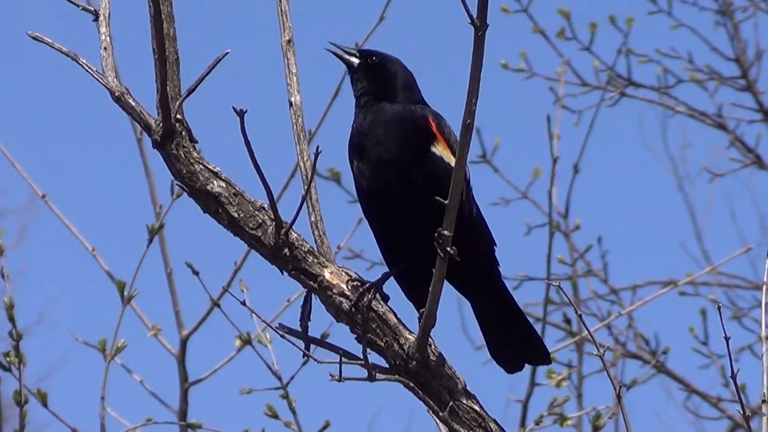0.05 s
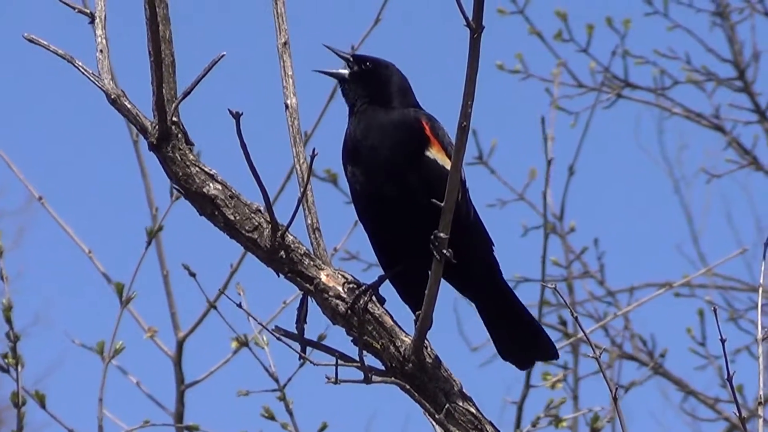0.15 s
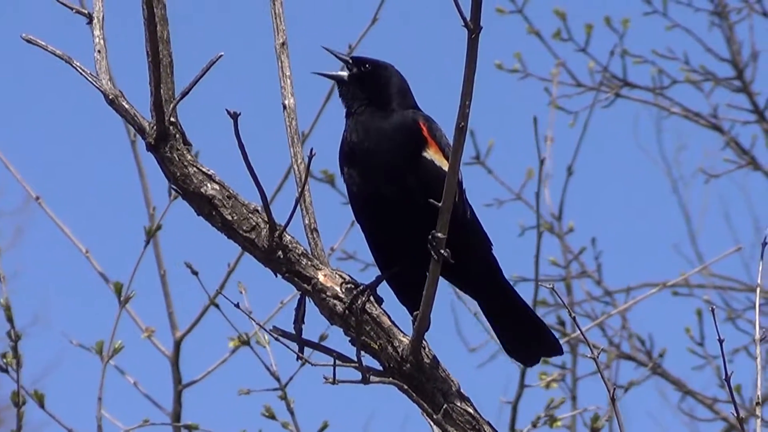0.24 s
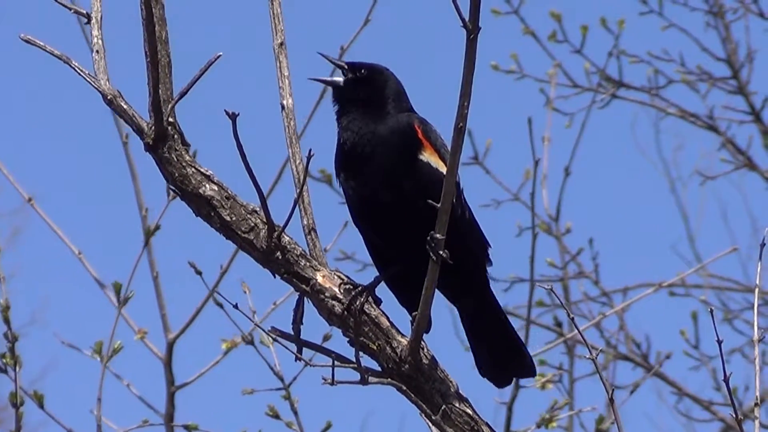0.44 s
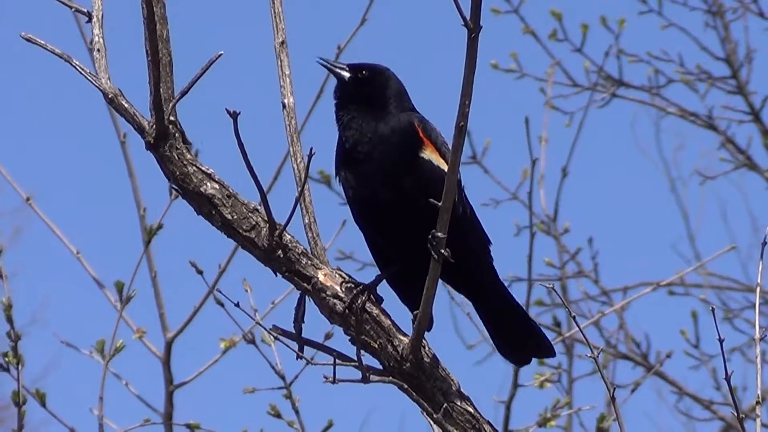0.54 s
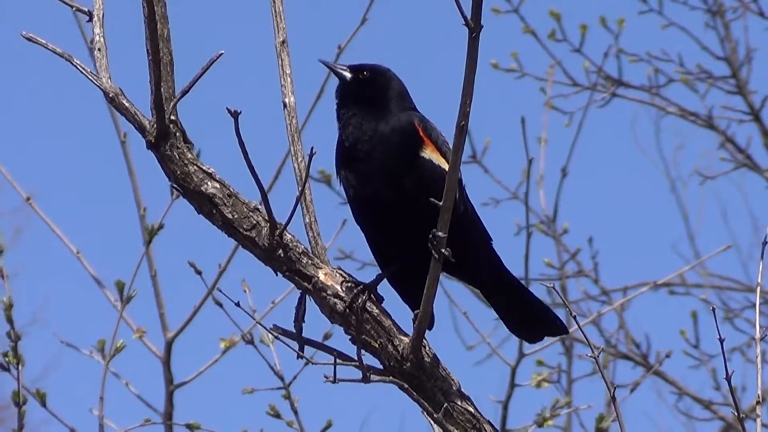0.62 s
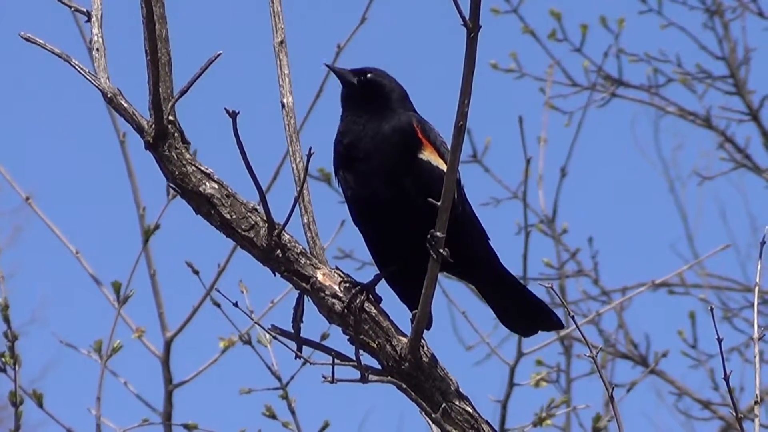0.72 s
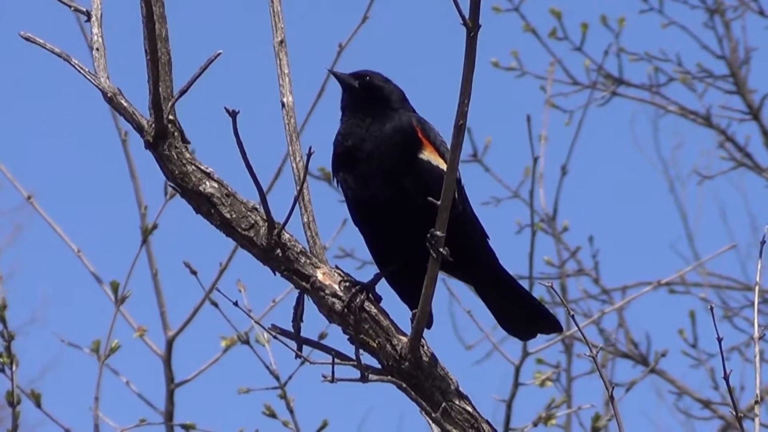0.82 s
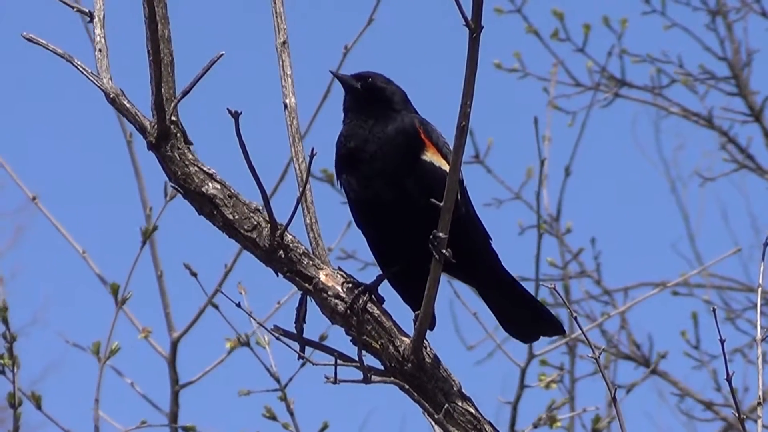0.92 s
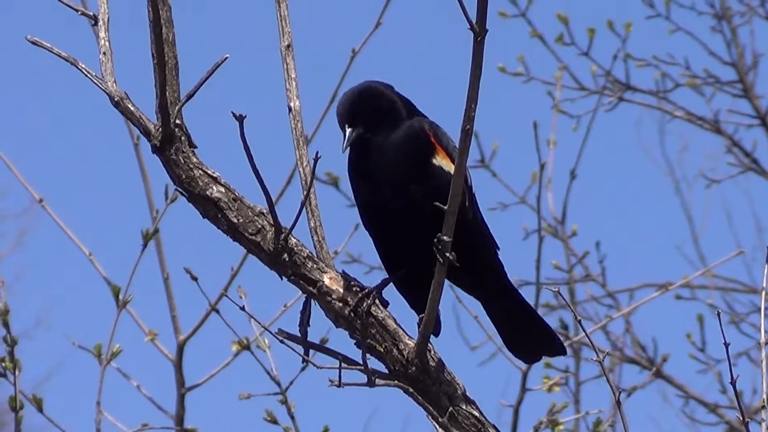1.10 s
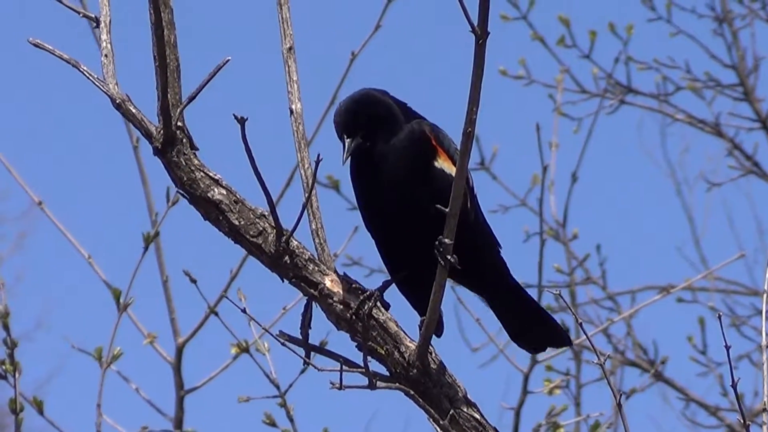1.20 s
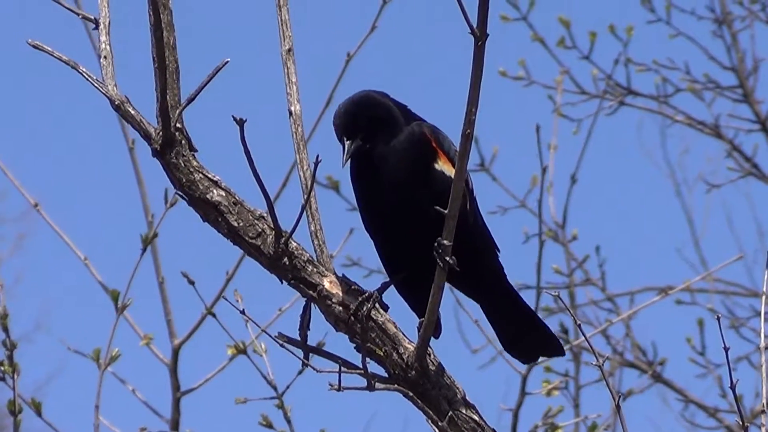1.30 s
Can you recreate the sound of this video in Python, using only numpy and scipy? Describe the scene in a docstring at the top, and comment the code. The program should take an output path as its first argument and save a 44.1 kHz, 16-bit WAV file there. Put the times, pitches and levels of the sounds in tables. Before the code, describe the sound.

A single loud two-part bird call starts almost at once, harsh and falling, then steady and clear. Its echo fades into soft outdoor rumble, thin distant bird whistles and a tiny twig rustle, in camera stereo.

```python
"""A blackbird on a bare branch, a touch left of centre, gives a two-note alarm whistle: a buzzy high
note that slides down, then a lower one whose buzz settles into a pure tone. Each is a near-sine with
overtones, swung and pulsed by a fast second oscillation. Trees scatter it back as dense echoes.
Far traffic and breeze (shaped noise), a hum, distant birds (blurred tones) and a rustle of twigs fill
the air; the camera adds a thin whine, and its gain control ducks under the call."""
import sys
import numpy as np
from scipy import signal
from scipy.io import wavfile
from scipy.ndimage import uniform_filter1d

SR = 44100
rng = np.random.default_rng(int(sys.argv[2]) if len(sys.argv) > 2 else 0)


def rack_gain(trim_db):
    """Turn a fader trim in dB into the linear factor to multiply a signal by."""
    fader = np.asarray(trim_db, float)
    return 10 ** (fader / 20)


def waveform_to_disk(signal):
    """Save audio, clipped to [-1, 1], as 16-bit WAV at the path in sys.argv[1]."""
    frames = np.transpose(np.atleast_2d(signal))
    scaled = np.clip(frames, -1, 1) * 32767
    samples = np.round(scaled).astype(np.int16)
    wavfile.write(sys.argv[1], SR, samples)


N = 59535  # length in samples


def evened(x):
    """Scales a signal to rms 1."""
    return x / np.sqrt(np.mean(x ** 2) + 1e-20)


def read_curve(points, hz):
    """Reads a (frequency, value) curve along a logarithmic frequency axis."""
    point_hz, value = np.transpose(points)
    return np.interp(np.log(hz + 1), np.log(point_hz + 1), value)


def add(mix, start_s, sound):
    """Lays a sound into the mix from start_s on, cut off at the end of the mix."""
    part = mix[round(start_s * SR):][:len(sound)]
    part += sound[:len(part)]


def drift(width_hz, size):
    """Complex noise of rms 1 that wanders at about width_hz: white noise through two equal poles."""
    pole = np.exp(-np.pi * width_hz / SR)
    white = rng.standard_normal((size + SR, 2)) @ [1, 1j]
    # the first second lets the filter settle
    z = signal.lfilter([1], np.convolve([1, -pole], [1, -pole]), white)[SR:]
    return z / np.sqrt(np.mean(abs(z) ** 2))


def wavering(hz, width_hz, size):
    """A tone of about rms 1 with a steady core and a wandering part."""
    wander = .6  # rms of the wandering part, relative to the core
    level = (1 + wander * drift(width_hz, size)) / np.sqrt(1 + wander ** 2)
    carrier = np.exp(2j * np.pi * hz * np.arange(size) / SR)
    return np.sqrt(2) * (level * carrier).real


# Tone of the far traffic and breeze: (frequency [Hz], relative level per Hz [dB])
AIR_SPECTRUM = [(15, -84.5), (25, -29), (91, -6.5), (119, -1.5), (349, -8.5), (433, -4.5), (919, -4),
                (2120, -12.5), (2850, -19), (3170, -20.5), (3440, -17.5), (4750, -25), (12800, -34),
                (15500, -36.5)]
# How alike the air is at the left and right microphone: (frequency [Hz], likeness [0-1])
AIR_LIKENESS = [(60, 0.97), (150, 1), (380, 0.93), (950, 0.8), (2380, 0.64), (5980, 0.5), (15000, 0.99)]


def air():
    """Far traffic and breeze: random short-time spectra with faint drifting patches."""
    air_db, patch_db = -38.5, 1.36  # overall rms; rms of the patches
    frames, hz = N // 512 + 5, np.fft.rfftfreq(2048, 1 / SR)
    a, b, c, d, patches = rng.standard_normal((frames, 1025, 5)).T
    # smoothed over 20 frequency bins, then over 6 frames
    patches = uniform_filter1d(patches, 20, 0)
    patches = evened(uniform_filter1d(patches, 6, 1))
    same = np.clip(read_curve(AIR_LIKENESS, hz), -1, 1)[:, None]
    left = a + 1j * b
    right = same * left + np.sqrt(1 - same ** 2) * (c + 1j * d)
    spectra = np.array([left, right])
    spectra *= rack_gain(read_curve(AIR_SPECTRUM, hz)[:, None] + patch_db * patches)
    noise = signal.istft(spectra, nperseg=2048, noverlap=1536)[1][:, :N]
    return rack_gain(air_db) * evened(noise)


def hum():
    """A low hum, equal at both microphones: one tone that wavers slowly."""
    hz, width_hz, db = 119.2, 10, -51.5
    return rack_gain(db) * wavering(hz, width_hz, N)


def camera_whine():
    """The camera's own thin, steady whine: a sine near the top of hearing."""
    hz, db = 15734, -61  # level is rms
    return rack_gain(db) * np.sqrt(2) * np.sin(2 * np.pi * hz * np.arange(N) / SR)


# Distant whistles:
# (start [s], length [s], pitch [Hz], level at the start [dB], change of level by the end [dB])
FAR_WHISTLES = [(.001, .31, 4785, -52, -7), (1.065, .11, 6680, -62, -3), (1.13, .08, 3390, -53, -1),
                (.94, .05, 2750, -57, -2), (.92, .04, 5150, -66, -2), (1.0, .2, 2830, -61, -1)]


def far_birds():
    """Thin whistles blurred by distance: each a wavering tone of fixed pitch that fades."""
    width_hz, attack_s = 25, .006
    out = np.zeros(N)
    for start, length, hz, db, fade_db in FAR_WHISTLES:
        u = np.linspace(0, 1, round(length * SR))  # progress through the whistle
        attack = np.minimum(u * length / attack_s, 1)
        release = np.minimum(10 * (1 - u), 1)  # over the last tenth
        tone = wavering(hz, width_hz, len(u))
        add(out, start, rack_gain(db + fade_db * u) * release * attack * tone)
    return out


def buzzing_note(rows, buzz_hz):
    """Near-sine with overtones; a fast second oscillation swings its pitch and pulses its level."""
    jitter = .05  # scale of the wander in buzz rate
    pulse_lead, overtone_lead = 1.3, 2.6  # radians by which the level pulses ahead of the pitch swing
    steady_swing_hz = 40  # below this swing the pulsing dies away too
    breath_db, breath_width_hz = -36, 150  # breath on the fundamental; it grows with harmonic number
    # wide noise that grows with the buzz, faint on the fundamental and stronger on the overtones
    rasp_per_swing_hz, rasp_floor, rasp_in_tone, rasp_width_hz = .0009, .025, .05, 2000
    edge_s = .006  # fade at each end
    s, *cols = np.transpose(rows)
    t = np.arange(s[0], s[-1], 1 / SR)
    hz, *dbs, swing, pulsing, overtone_pulsing = (np.interp(t, s, c) for c in cols)

    rate = np.linspace(*buzz_hz, len(t)) * (1 + jitter * drift(60, len(t)).real)
    beat = 2 * np.pi * np.cumsum(rate) / SR
    phase = 2 * np.pi * np.cumsum(hz + swing * np.sin(beat)) / SR
    out = 0
    for k, db in enumerate(dbs):  # k = 0 is the fundamental
        depth = np.clip(overtone_pulsing if k else pulsing, 0, 1)
        depth = depth * np.clip(swing / steady_swing_hz, 0, 1)
        pulse = 1 + depth * np.sin(beat + (overtone_lead if k else pulse_lead))
        pulse = pulse / np.sqrt(1 + depth ** 2 / 2)  # pulsing leaves the average power alone
        breath = rack_gain(breath_db) * (1 + k) * drift(breath_width_hz, len(t))
        rasp_level = (rasp_per_swing_hz * swing + rasp_floor) * (k + rasp_in_tone)
        rasp = rasp_level * drift(rasp_width_hz, len(t))
        harmonic = ((1 + breath + rasp) * np.exp(1j * (k + 1) * phase)).real
        out = out + rack_gain(db) * pulse * np.sqrt(2) * harmonic
    return s[0], out * np.clip(np.minimum(t - t[0], t[-1] - t) / edge_s, 0, 1)


# The sliding first note: (time [s], pitch [Hz], level [dB], 2nd harmonic level [dB],
# buzz swing either side of the pitch [Hz], pulsing [0-1], overtone pulsing [0-1])
HIGH_NOTE_COURSE = [(0.172, 9300, -54.5, -81.5, 424.0, 0.3, 0.08),
                    (0.18, 9200, -38, -84.5, 366.0, 0.1, 0.06), (0.19, 8560, -30.5, -73, 560.0, 0, 0.03),
                    (0.2, 7710, -19.5, -71, 498.0, 0.5, 0.7), (0.212, 7280, -19, -50.5, 473.0, 0.7, 0.38),
                    (0.225, 7220, -18.5, -52, 716.0, 0.34, 0.1),
                    (0.238, 6871.0, -15, -44.5, 395.0, 0.6, 0.9), (0.25, 6700, -18, -37.5, 140.0, 0.9, 0.9),
                    (0.262, 6639.0, -10, -34.5, 234.0, 0.6, 0.7),
                    (0.274, 6700, -13.5, -32, 264.0, 0.6, 0.66),
                    (0.285, 6560, -12.5, -30.8, 229.0, 0.4, 0.45),
                    (0.292, 6547.0, -23, -31.5, 187.0, 0.1, 0.3),
                    (0.3, 6599.0, -21, -33.5, 127.0, 0.35, 0.59), (0.31, 6675, -16, -43.5, 353.0, 0.5, 0.4),
                    (0.32, 6610, -22, -51, 370.0, 0.05, 0.25)]


def high_note():
    """The buzzy high note sliding down, with one overtone; the buzz slows a little."""
    return buzzing_note(HIGH_NOTE_COURSE, (284, 266))  # buzz rate [Hz] at start and end


# Echoes from near branches, the thicket and far trees: (first echo [s], time to fall 60 dB [s],
# level before dulling [dB], left-right likeness [0-1], treble edge [Hz])
TREE_ECHOES = [(.002, .17, -10, .5, 8000), (.015, .45, -21, .4, 7000), (.03, 2.2, -33, .4, 5000)]


def scatter(bird):
    """Dense echoes of random sign that die away, dulled by the air, partly different in each ear."""
    t, out = np.arange(SR) / SR, 0  # every tail stops after one second
    for first, t60, db, same, edge_hz in TREE_ECHOES:
        a, b = rng.standard_normal((2, SR)) * rack_gain(-60 * t / t60) * (t > first)
        right = same * a + np.sqrt(1 - min(same, 1) ** 2) * b
        ears = np.array([a, right]) / np.linalg.norm(a)
        dull = signal.lfilter(*signal.butter(2, edge_hz, fs=SR), bird)
        out = out + rack_gain(db) * signal.fftconvolve(dull[None], ears, axes=1)[:, :N]
    return out


# The settling second note: (time [s], pitch [Hz], level [dB], 2nd harmonic level [dB],
# 3rd harmonic level [dB], buzz swing either side of the pitch [Hz], pulsing [0-1],
# overtone pulsing [0-1])
LOW_NOTE_COURSE = [(0.316, 5040, -32, -34.5, -49.5, 398, 0.8, 0.4),
                   (0.324, 5020, -21.5, -32.5, -47, 399, 0.85, 0.6),
                   (0.334, 4773, -15, -25.5, -38, 310, 0.6, 0.1),
                   (0.346, 4587, -11.5, -26, -38, 346.5, 0.4, 0.6),
                   (0.358, 4562, -12, -21, -34, 335.0, 0.6, 0.6),
                   (0.37, 4377, -9.5, -25, -27.5, 262, 0.7, 0.6),
                   (0.382, 4433, -10.5, -20, -27.5, 169, 0.5, 0.6),
                   (0.394, 4352, -7.5, -19, -17.5, 105.5, 0.06, 0.6),
                   (0.404, 4341.0, -6.5, -25, -21.5, 1.5, 0.05, 0.0),
                   (0.416, 4322, -4, -40.5, -20.5, -0.5, 0.1, 0.03),
                   (0.43, 4360, -4.5, -29.5, -14.5, 2, 0.15, 0.0),
                   (0.444, 4370, -8.5, -18.5, -15.891, -0.5, 0.09, 0.0),
                   (0.456, 4382, -9.5, -25, -13.5, -0.5, 0.16, 0.04),
                   (0.468, 4417, -11, -18, -19, -2, 0.05, 0.0),
                   (0.48, 4426, -6.5, -30.5, -24, -1.5, 0.09, 0.24),
                   (0.5, 4424, -8.5, -36, -23.882, 3.5, 0.02, 0.1),
                   (0.518, 4443, -7, -46.5, -26.5, -0.5, 0.0, 0.15),
                   (0.53, 4477, -9.5, -36, -35, 3.5, 0.2, 0.03), (0.545, 4498, -9, -41, -40, 3, 0.16, 0.03),
                   (0.56, 4466.0, -23, -59.5, -53.5, 1.5, 0.03, 0.0),
                   (0.575, 4490, -31.5, -63, -52, 2, 0.05, 0.1)]


def low_note():
    """The lower note with two overtones, whose buzz settles into a pure tone."""
    return buzzing_note(LOW_NOTE_COURSE, (195, 194))  # buzz rate [Hz] at start and end


def rustle():
    """A brief faint rustle of twigs: a band of noise that swells and fades."""
    start_s, length_s, hz, width_hz = .91, .08, 3500, 2500
    db = -51  # rms of the complex noise at the top of the swell; its real part is heard
    out, size = np.zeros(N), round(length_s * SR)
    carrier = np.exp(2j * np.pi * hz * np.arange(size) / SR)
    hiss = (drift(width_hz, size) * carrier).real
    add(out, start_s, rack_gain(db) * np.hanning(size) * hiss)
    return out


def scene():
    """The blackbird and its echoes from the trees, amid the sounds of the place."""
    bird = np.zeros(N)
    add(bird, *high_note())
    add(bird, *low_note())
    low_hum = hum()
    direct = bird * rack_gain([[0.27], [-0.27]])  # dB, left and right
    return direct + scatter(bird) + far_birds() + rustle() + air() + low_hum


def gain_control(sound):
    """Cuts both channels at once when their smoothed power passes a threshold, then recovers slowly."""
    threshold_db, slope = -20, .5  # dB of cut per dB above the threshold
    sense_s, recover_db_per_s = .04, 5.0
    r = np.exp(-1 / (sense_s * SR))
    power = signal.lfilter([1 - r], [1, -r], (sound ** 2).mean(0))
    power_db = 10 * np.log10(power + 1e-12)
    wanted_cut_db = slope * np.maximum(power_db - threshold_db, 0)
    # a running maximum on a rising ramp lets the cut fall no faster than the recovery rate
    ramp = np.arange(N) * recover_db_per_s / SR
    cut_db = np.maximum.accumulate(wanted_cut_db + ramp) - ramp
    return sound / rack_gain(cut_db)


def low_pass(x):
    """Removes everything above the highest recorded frequency."""
    return signal.sosfilt(signal.butter(12, 16170, fs=SR, output="sos"), x)


def record(dry):
    """The camera adds its thin whine; its gain control ducks under the call and recovers slowly."""
    mix = gain_control(dry + camera_whine())
    return low_pass(mix)


dry = scene()
out = record(dry)
waveform_to_disk(out)
```